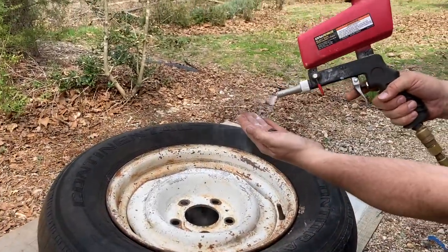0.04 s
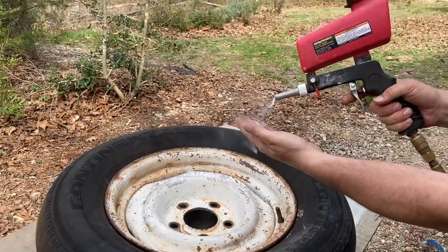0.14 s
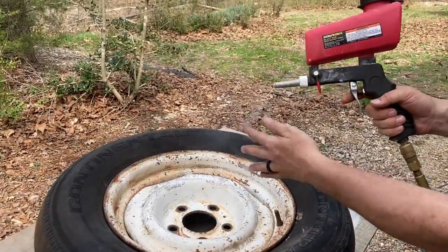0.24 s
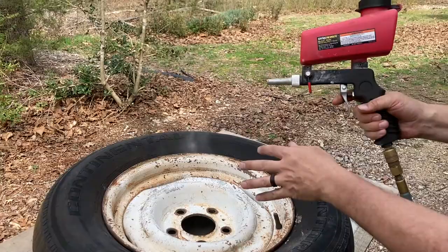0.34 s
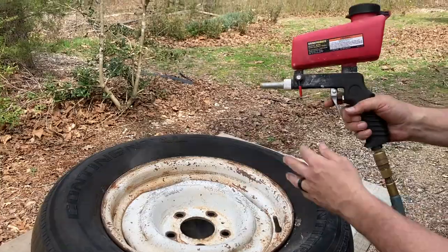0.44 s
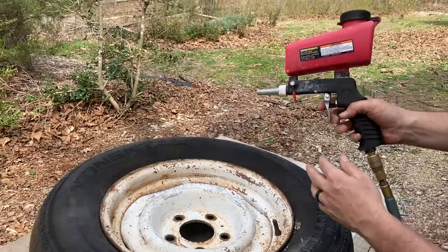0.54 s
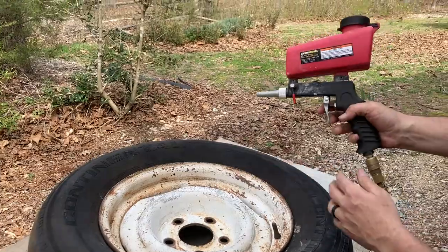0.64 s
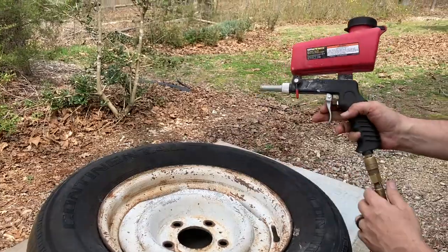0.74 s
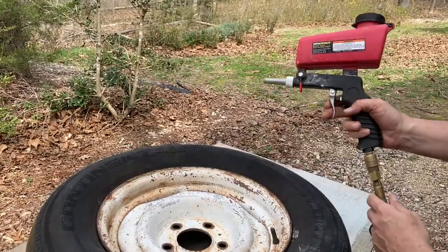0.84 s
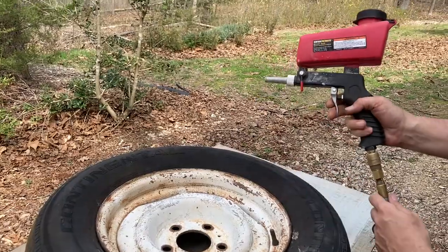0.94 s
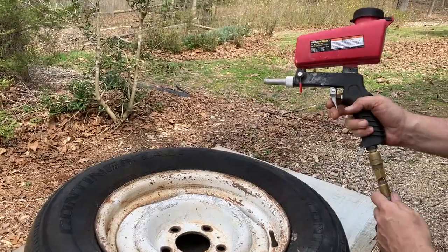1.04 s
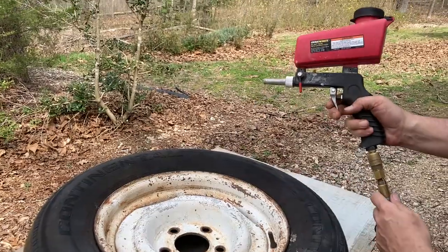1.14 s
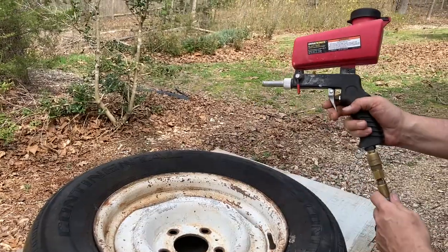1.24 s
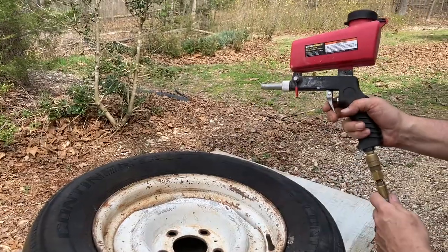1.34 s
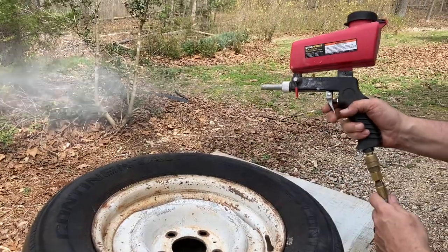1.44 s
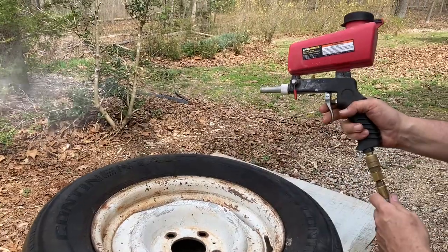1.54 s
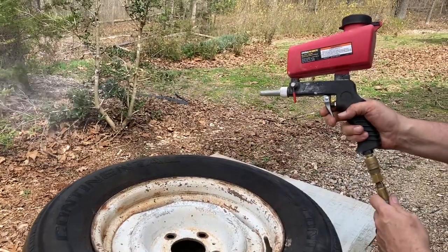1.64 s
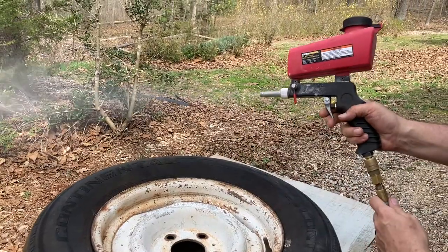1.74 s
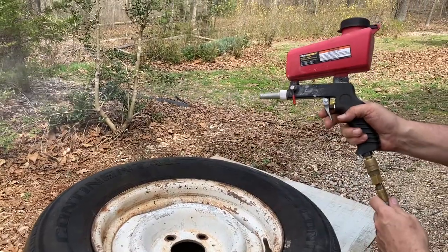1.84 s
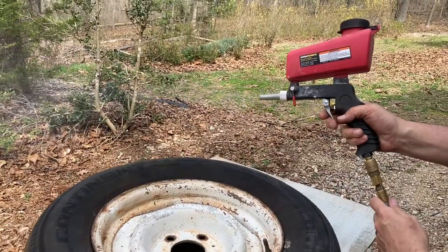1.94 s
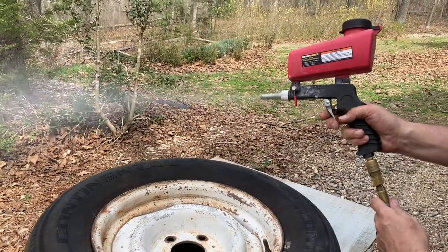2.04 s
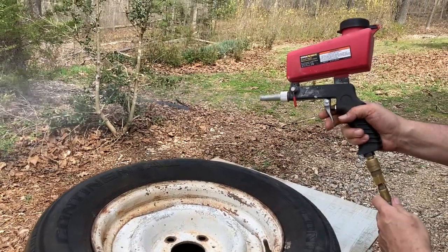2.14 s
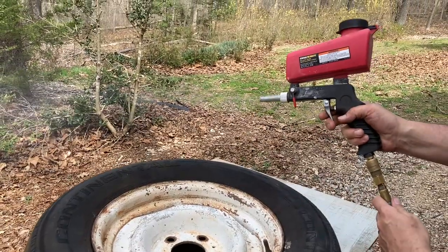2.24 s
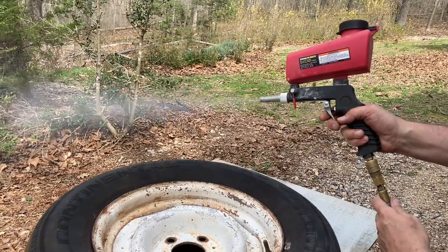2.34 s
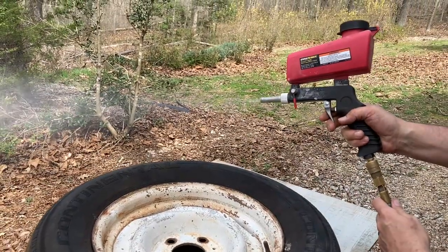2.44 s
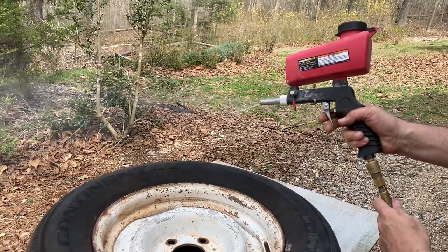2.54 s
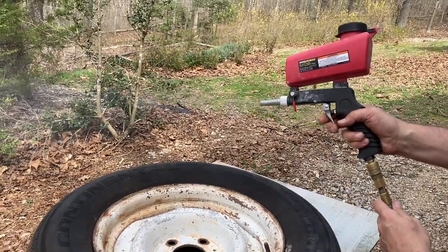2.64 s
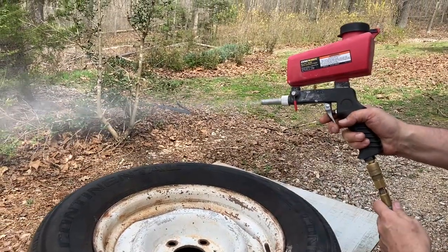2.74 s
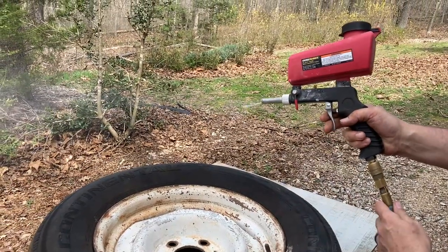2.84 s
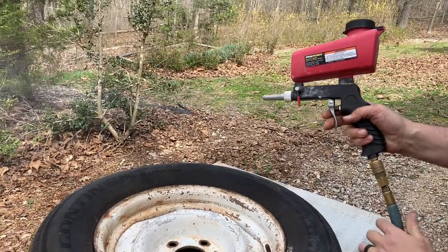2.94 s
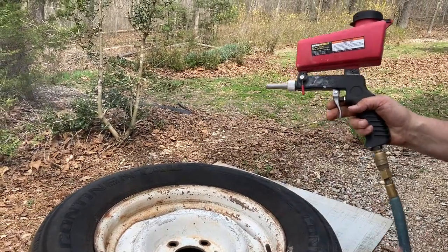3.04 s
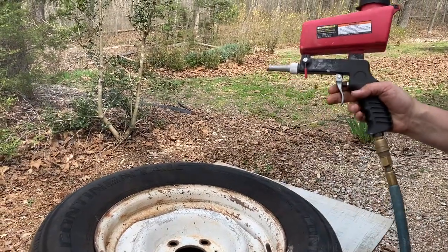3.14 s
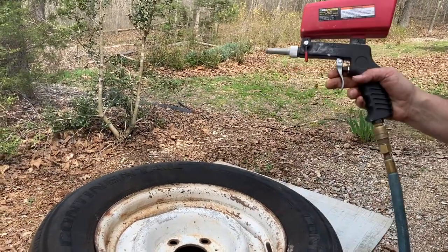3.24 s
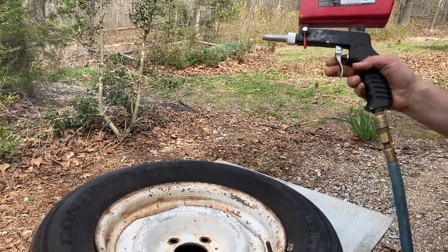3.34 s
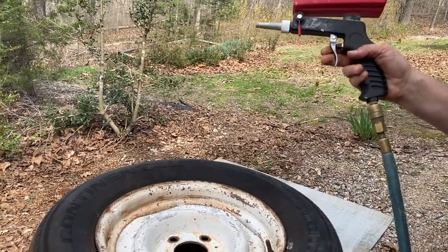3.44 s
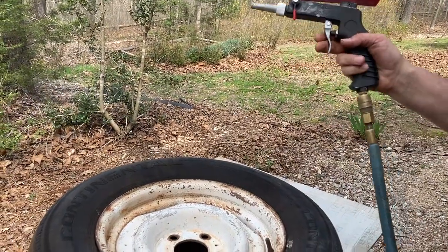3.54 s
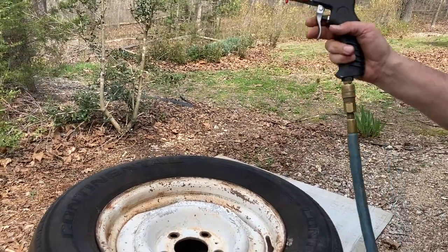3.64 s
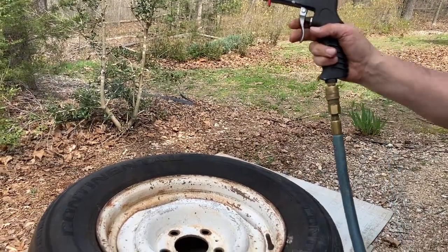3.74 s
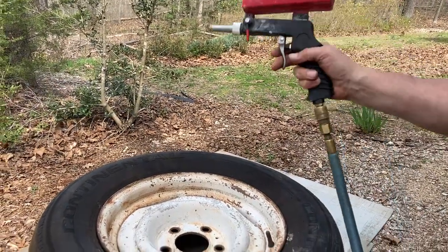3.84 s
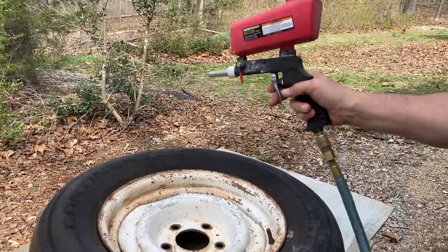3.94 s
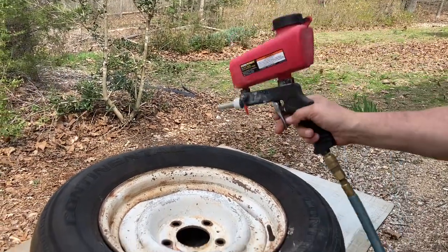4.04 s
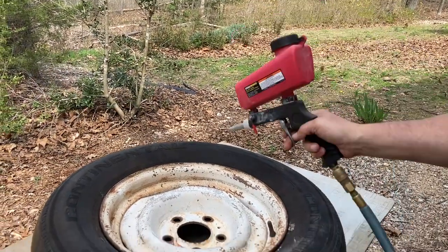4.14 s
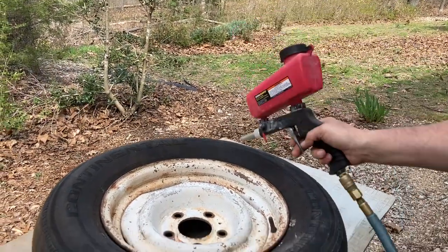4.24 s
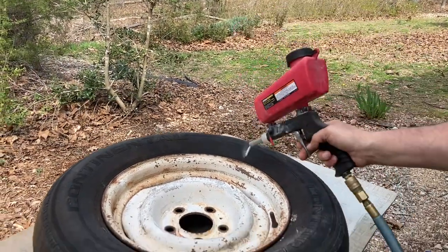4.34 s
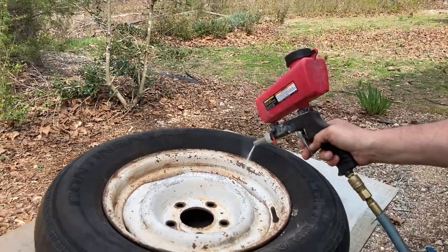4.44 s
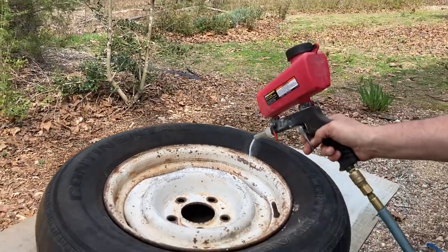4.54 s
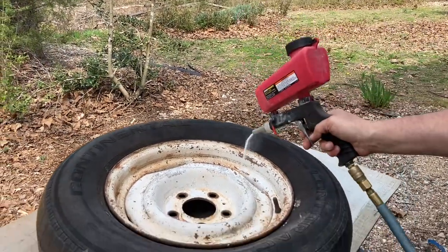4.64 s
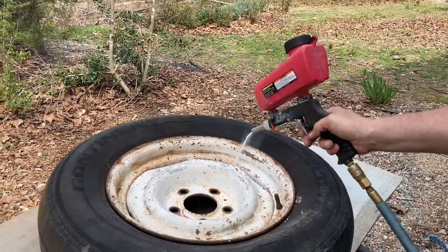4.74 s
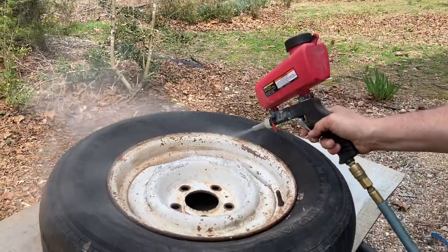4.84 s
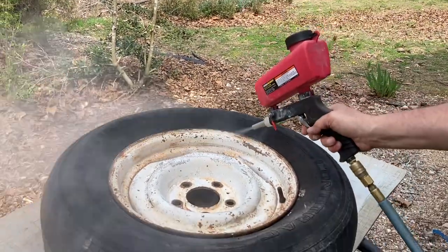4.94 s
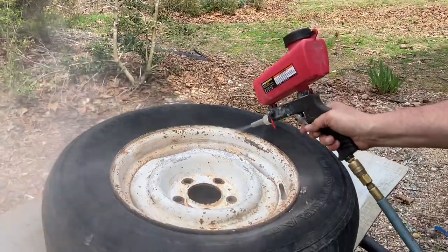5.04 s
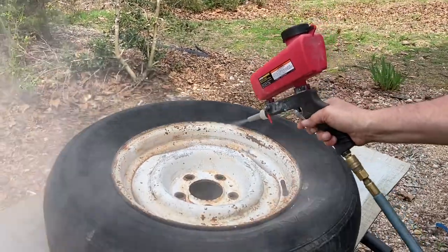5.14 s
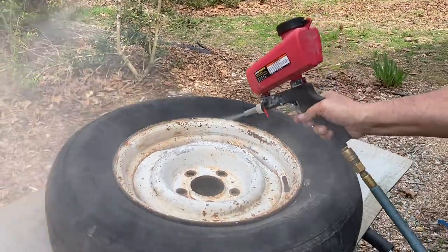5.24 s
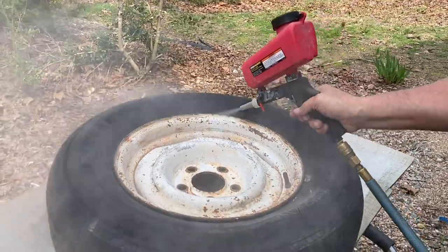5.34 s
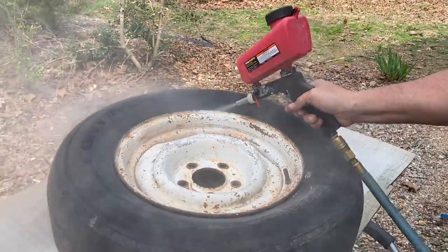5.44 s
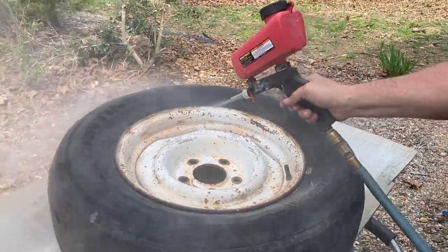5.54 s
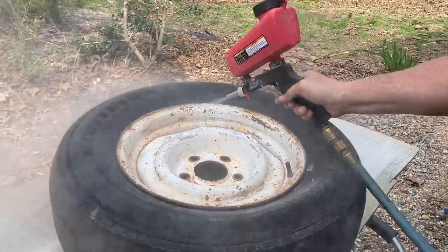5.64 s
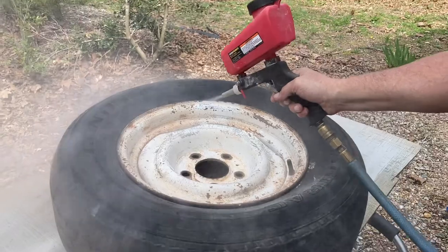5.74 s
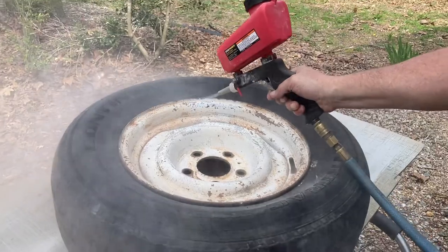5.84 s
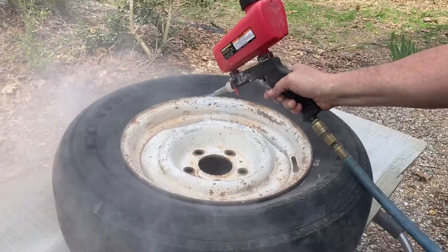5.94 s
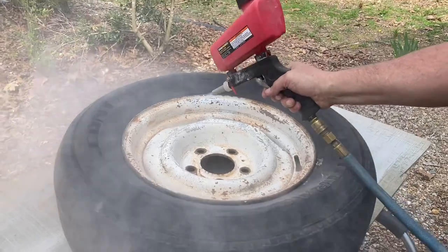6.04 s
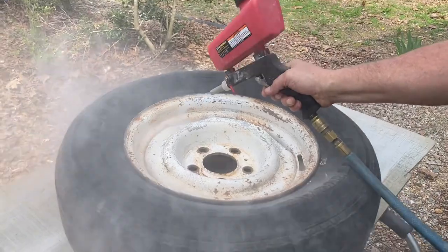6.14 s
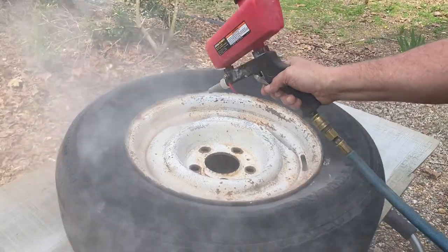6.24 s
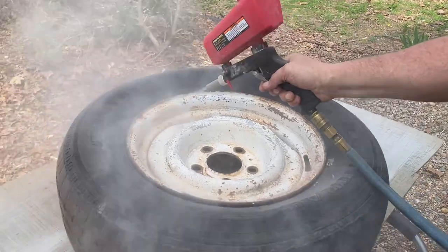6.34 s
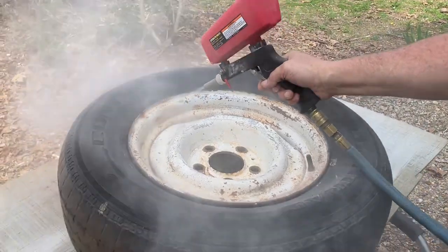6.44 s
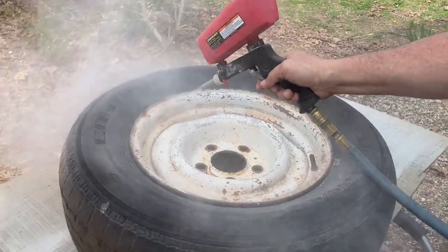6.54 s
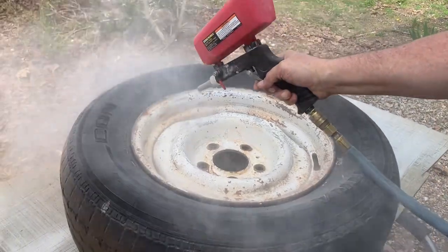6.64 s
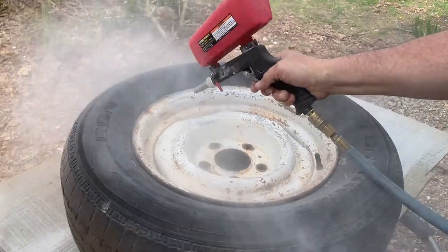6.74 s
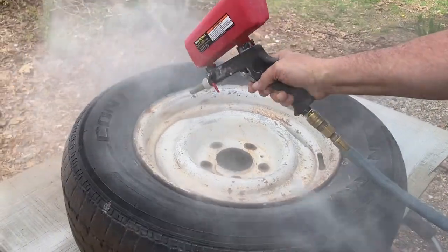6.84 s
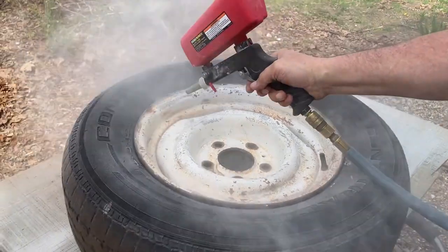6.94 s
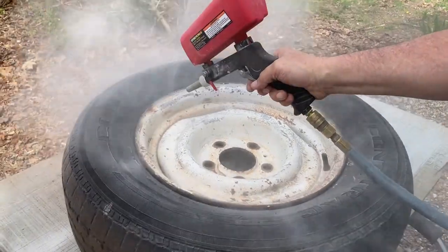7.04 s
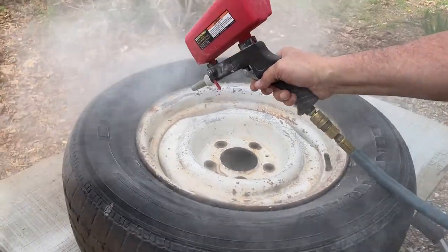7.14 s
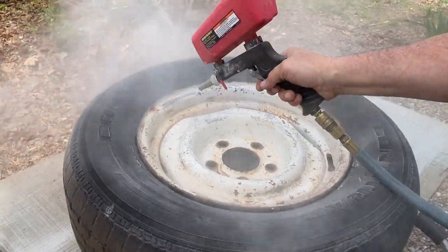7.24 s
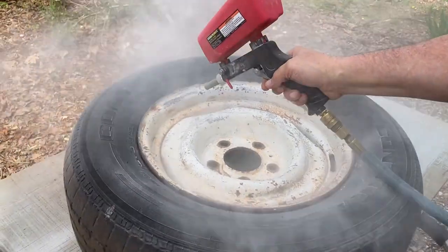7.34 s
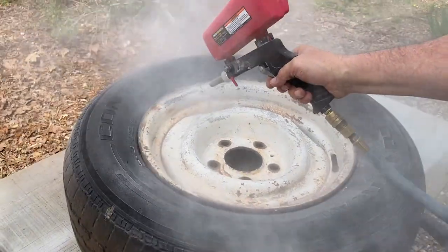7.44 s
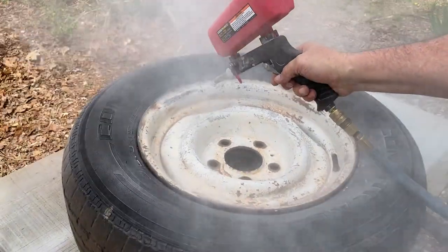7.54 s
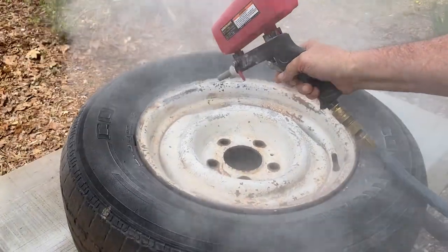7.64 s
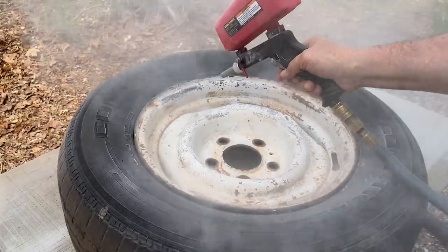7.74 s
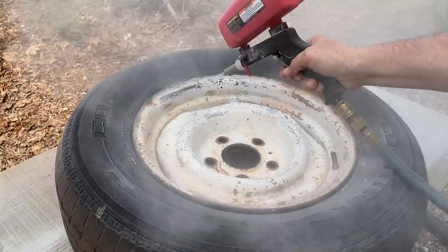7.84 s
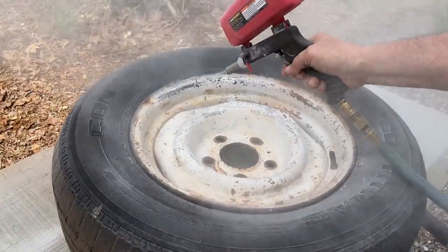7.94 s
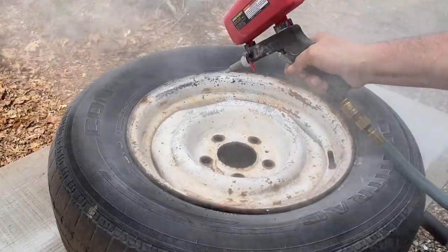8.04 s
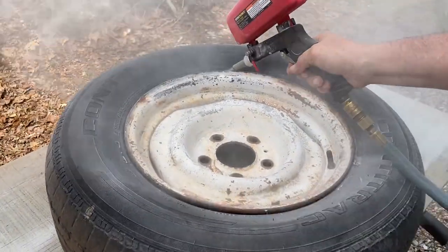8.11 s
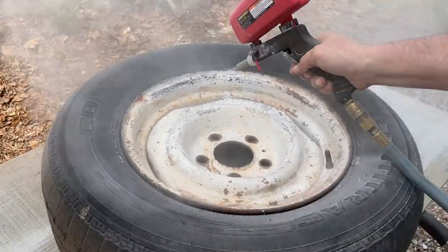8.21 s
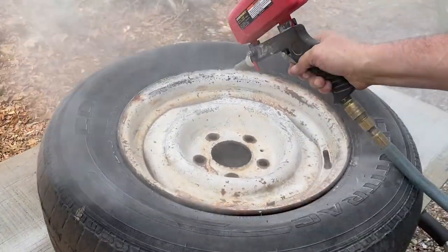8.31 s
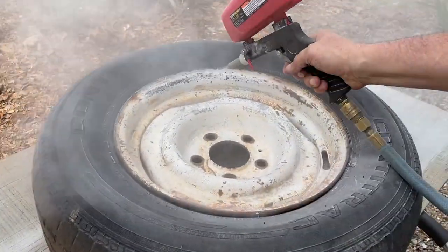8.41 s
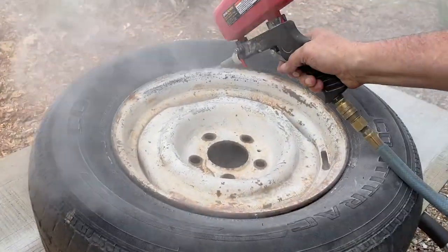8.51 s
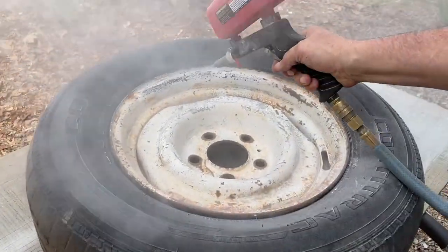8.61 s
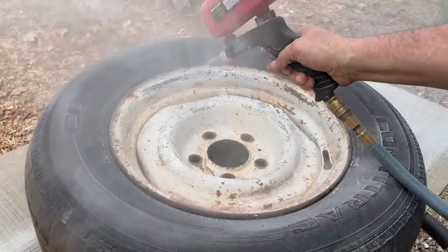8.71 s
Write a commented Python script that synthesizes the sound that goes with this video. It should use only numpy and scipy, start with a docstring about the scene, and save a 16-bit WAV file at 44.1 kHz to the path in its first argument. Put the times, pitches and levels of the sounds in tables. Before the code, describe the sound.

Five short, sharp air-gun puffs outdoors with leafy rustles around them, then one long, loud, harsh blast of powder against a steel wheel.

```python
"""Powder blaster in a yard

Five short puffs into open air, with shuffling on dry leaves and gravel before and after; then one long blast
against a steel wheel. The jets are coloured noise under valve curves; wheel and tyre resonances colour the
blast. Knocks and jolts are damped swings, footing is grains of noise, and a far rumble lies under it all. Two
microphone ports hear the sources with their own lead, likeness and balance; the spray is unrelated at each."""
import sys
import numpy as np
from scipy import signal
from scipy.fft import rfft, irfft, next_fast_len
from scipy.io import wavfile
from scipy.ndimage import uniform_filter1d

SR = 44100
rng = np.random.default_rng(int(sys.argv[2]) if len(sys.argv) > 2 else 0)


def store_wav(level_fs):
    """Save 16-bit WAV to argv[1]."""
    pcm = np.round(np.clip(np.atleast_2d(level_fs), -1, 1) * 32767)
    wavfile.write(sys.argv[1], SR, pcm.T.astype(np.int16))


N = 386757
T = np.arange(N) / SR  # seconds
SILENT_DB = -200

# Either valve starts to leak LEAK_S before it is fully open; the leak lies LEAK_DB from a reference level.
LEAK_S, LEAK_DB = 0.008, -18.5

# Trigger pull at the wheel: cracks_s, open_s, settled_s (first surge ends), surge_db (at open_s)
BLAST_VALVE = (4.768, 4.780, 4.797, 5.0)
# Nozzle hiss as the gun sweeps: time_s, level_db (before the valve and high-passes)
NOZZLE_LEVEL = [(4.82, -18.5), (4.95, -24.5), (5.3, -22), (5.65, -24), (5.95, -21), (6.17, -27.5),
                (6.42, -23.5), (6.66, -27.5), (7.01, -25), (7.37, -26.5), (7.8, -21), (8.05, -20.5),
                (8.4, -23.5), (8.55, -22.5), (8.77, -24)]
# The jet moving round the wheel, before the valve and high-passes:
# time_s, steel_db (powder on steel), rim_db, upper_rim_db, tyre_db
WHEEL_LEVEL = [(4.85, -25.5, -34.5, -23, -34), (5.03, -29.5, -31, -31, -28.5), (5.15, -27, -27, -25, -28),
               (5.3, -25, -32.5, -23.5, -40), (5.7, -29, -31, -29, -34), (6.12, -29.5, -31.5, -37.5, -35),
               (6.45, -29.5, -37, -34.5, -38), (7.0, -26.5, -43.5, -40, -49.5), (7.4, -28, -38, -37.5, -39),
               (7.75, -25, -34.5, -37.5, -35), (8.3, -30.5, -37, -32.5, -41.5),
               (8.77, -28.5, -38.5, -45.5, -40)]
# Resonances of each part: pitch_hz, width_hz (between half-amplitude points), level_db (relative)
NOZZLE_MODES = [(7890, 2860, 2.5), (10150, 760, 3.5), (12180, 4800, 0), (16100, 2500, -4)]
STEEL_MODES = [(2300, 950, -2), (3760, 1220, -1.1), (4800, 800, -1)]
RIM_MODES = [(770, 257, -11), (980, 860, 8.5)]
UPPER_RIM_MODES = [(1500, 660, 0)]
TYRE_MODES = [(200.8, 22.7, 7), (295, 43, -6), (388, 65, -9.5)]
BLAST_SPUTTER_DB = 0.45  # rms swing


def blast():
    """Long jet at the wheel: hiss from nozzle and steel; rim and tyre ring and sputter with the powder feed."""
    cracks, opened, settled, surge_db = BLAST_VALVE
    valve_times = [cracks, opened - LEAK_S, opened, settled, settled + 0.022]
    valve_db = np.interp(T, valve_times, [-35, LEAK_DB, surge_db, surge_db / 2, 0], SILENT_DB)

    nozzle_db = np.interp(T, *np.transpose(NOZZLE_LEVEL))
    s, *columns = np.transpose(WHEEL_LEVEL)
    steel_db, rim_db, upper_rim_db, tyre_db = (np.interp(T, s, column) for column in columns)
    nozzle = gain_of(nozzle_db) * hiss(ringing(NOZZLE_MODES), 2.14)
    wheel = gain_of(steel_db) * hiss(ringing(STEEL_MODES), 2.13)
    fine_powder = signal.butter(2, 800, "highpass", fs=SR, output="sos")  # fine powder makes no low sound
    nozzle, wheel = signal.sosfilt(fine_powder, [nozzle, wheel])

    sputter = gain_of(BLAST_SPUTTER_DB * uneven_feed())
    for modes, level_db in [(RIM_MODES, rim_db), (UPPER_RIM_MODES, upper_rim_db), (TYRE_MODES, tyre_db)]:
        wheel += sputter * gain_of(level_db) * hiss(ringing(modes), 1.2)
    no_bass = signal.butter(3, 140, "highpass", fs=SR, output="sos")  # a small jet radiates no deep bass
    return signal.sosfilt(no_bass, gain_of(valve_db) * (nozzle + wheel))


# Trigger pulls into open air: open_s (fully open), held_s, surge_db (hiss level at open_s)
PUFFS = [(1.374, 0.074, -13.5), (1.673, 0.058, -14), (1.96, 0.096, -14), (2.306, 0.13, -16.5),
         (2.663, 0.09, -17.5)]
# Colours of the thin hiss, the lumpy roar, and the kick as the hose unloads: pitch_hz, density_db (relative, per Hz)
FREE_JET = [(2500, -11), (4200, -6), (6300, -1), (8500, 0.5), (11500, 3.5), (16000, -2)]
FREE_ROAR = [(200, -15.5), (400, -9), (1000, 0.5), (2200, 0), (2800, -10.5), (3200, 4), (3650, -5.5),
             (4100, 9), (6000, -46)]
KICK = [(30, -3.5), (65, -6), (170, -15.5), (350, -5), (800, -48.5)]
STEADY_DB, ROAR_DB = -20.5, -10  # every surge drifts to one steady hiss by closing; roar gain beside the hiss
PUFF_SPUTTER_DB = 2.5  # rms swing of the roar
CRACK_S, CRACK_DB = 0.013, -16  # the valve cracks this long before it is open; first seep relative to the surge
ROAR_LEAK_DB = -12.5  # roar curve at the leak, relative to the surge
SHUT_S, BLEED_S = 0.0068, 0.068  # the valve shuts; trapped air bleeds out
THROB_S, THROB_LEAD_S, THROB_RISE_S, THROB_DB = 0.029, 0.0115, 0.0025, 3  # period, start before open, rise, lift
KICK_DB, KICK_PER_SURGE, KICK_S = -41.5, 2.95, 0.041  # kick at a steady surge, dB per dB of surge, fading time


def puffs():
    """Open-air jets under the valve: a pressure wave up and down the hose lifts the roar at each return."""
    thin = hiss(sloped(FREE_JET), 1.5)
    roar = hiss(sloped(FREE_ROAR), 2.5, gain_of(PUFF_SPUTTER_DB * uneven_feed()))
    low = hiss(sloped(KICK), 0)
    jets, kicks = np.zeros((2, 2, N))
    flow = np.zeros(N)
    for opened, held, surge_db in PUFFS:
        closing = opened + held
        shut = closing + SHUT_S
        times = [opened - CRACK_S, opened - LEAK_S, opened, closing, shut, shut + BLEED_S]
        seep_db = surge_db + CRACK_DB
        later_db = [surge_db, STEADY_DB, STEADY_DB - 13.5, STEADY_DB - 50]
        flow_db = np.interp(T, times, [seep_db, surge_db + LEAK_DB] + later_db, SILENT_DB, SILENT_DB)
        roar_db = np.interp(T, times, [seep_db, surge_db + ROAR_LEAK_DB] + later_db, SILENT_DB, SILENT_DB)

        since_return = (T - opened + THROB_LEAD_S) % THROB_S / THROB_RISE_S
        roar_db += THROB_DB * since_return * np.exp(1 - since_return) * (T < closing)
        jets += gain_of(flow_db) * thin + gain_of(roar_db + ROAR_DB) * roar
        flow += gain_of(flow_db)

        kick_db = KICK_DB + KICK_PER_SURGE * (surge_db - STEADY_DB)
        kick_times = [opened - LEAK_S, opened + 0.0019, opened + KICK_S]
        kick_shape_db = np.interp(T, kick_times, [-25, 0, -27], SILENT_DB, SILENT_DB)
        kicks += gain_of(kick_db + kick_shape_db) * low
    return jets + kicks, flow


def uneven_feed():
    """Powder arrives in lumps: noise between 20 and 55 Hz, scaled to rms 1."""
    band = signal.butter(2, [20, 55], "bandpass", fs=SR, output="sos")
    return evened(signal.sosfilt(band, rng.standard_normal(N)))


# Knocks at the nozzle, from powder clumps and from the pressure wave returning up the hose: start_s, level_db
# (envelope peak), pitch_hz
KNOCKS = [(1.372, -2, 4000), (1.373, -5.5, 1200), (1.665, -18, 1000), (1.690, -8, 2100), (1.958, -17, 900),
          (1.980, -33, 2270), (1.980, -11, 4100), (2.038, -18, 4200), (2.293, -26, 995),
          (2.311, -23.5, 1170), (2.326, -9, 2140), (2.354, -21.5, 895), (2.381, -17.5, 2100),
          (2.682, -14.5, 2280), (4.782, -24, 1590), (4.784, -5, 4300)]
# Jolts of the air column in the hose as the valve opens: start_s, level_db (envelope peak), pitch_hz
JOLTS = [(1.375, -13.5, 163), (1.379, -18, 114), (1.666, -18.5, 219), (1.955, -19, 300), (2.324, -32, 191),
         (2.651, -30, 299), (4.783, -25, 108)]
# The air column jolts as a puff's valve shuts: delay_s (after closing starts), level_db (envelope peak), pitch_hz
SHUT_JOLT = (0.005, -26, 220)


def spits():
    """Knocks at the nozzle and jolts of the air column, each one damped swing."""
    out = np.zeros((2, N))
    for start, level_db, pitch_hz in KNOCKS:
        add(out, start, ping(level_db, pitch_hz, cycles=1.2))
    delay, shut_db, shut_hz = SHUT_JOLT
    shut_jolts = [(opened + held + delay, shut_db, shut_hz) for opened, held, _ in PUFFS]
    for start, level_db, pitch_hz in JOLTS + shut_jolts:
        add(out, start, ping(level_db, pitch_hz, cycles=0.34))
    return out


# Powder thrown back off the wheel: time_s, level_db
SPRAY_LEVEL = [(4.79, -28.5), (5.35, -42), (6.15, -66), (6.55, -44.5), (7.7, -64), (8.15, -29.5),
               (8.5, -45)]
# Band of the spray: low_hz, high_hz
SPRAY_BAND = [4240, 6300]


def spray():
    """Rebounding powder all round the microphone: band noise, unrelated at the two ports."""
    level_db = np.interp(T, *np.transpose(SPRAY_LEVEL), SILENT_DB)
    band = signal.butter(2, SPRAY_BAND, "bandpass", fs=SR, output="sos")
    return gain_of(level_db) * evened(signal.sosfilt(band, rng.standard_normal((2, N))))


# Feet and hose on leaves and gravel: start_s, held_s, crackle_db, low_scuff_db, high_scuff_db
SHUFFLES = [(.28, 0.16, -66.5, -88, -68), (.525, 0.012, -71, -92, -69), (.94, 0.028, -71, -90, -70),
            (3.03, 0.11, -63, -84, -72), (3.14, 0.036, -57.5, -68, -66), (3.24, 0.1, -60, -54.5, -60.5),
            (3.55, 0.13, -53.5, -69, -70), (3.791, 0.089, -62.5, -66, -68), (3.92, 0.11, -58, -63, -62),
            (4.06, 0.075, -49, -62, -53), (4.195, 0.025, -44.5, -56, -53.5),
            (4.34, 0.024, -51.5, -55.5, -66)]
# Colour of the crackle: pitch_hz, density_db (relative, per Hz)
CRACKLE = [(2000, -27), (3400, 1), (5200, 4.5), (6600, -2), (9000, 6.5), (16000, 2)]
# Low scuff, then high scuff: pitch_hz, width_hz (between half-amplitude points), level_db (relative)
SCUFF_MODES = [
    [(1054, 1100, 0)],
    [(2110, 690, -8.5), (3380, 500, -13.5)],
]
# Single snaps underfoot: start_s, level_db (envelope peak), pitch_hz, ring_cycles,
# bright_db (wide tick against the ring, before TICK_DB)
SNAPS = [(0.110, -34, 1390, 0.32, -29), (0.535, -49.5, 2080, 2.1, 6), (3.211, -38, 1190, 1, -22),
         (3.270, -33, 1220, 0.85, -12), (3.808, -54, 2350, 1.9, 15), (3.837, -32.5, 1300, 0.25, -28),
         (4.197, -40, 1940, .6, 9), (4.251, -49, 3400, 2.5, -8), (4.264, -40, 2040, 1, 8),
         (4.274, -39, 1390, 0.84, -5), (4.334, -39, 1800, .6, -5)]
RISE_DB_PER_S, FALL_DB_PER_S = 294, 125.5
TICK_DB, TICK_T60_S = -6.5, 0.029  # offset of every tick; time to die by 60 dB


def shuffles():
    """Leaves and gravel underfoot: dense uneven grains of noise, duller scuffs, and single ringing snaps."""
    strengths = gain_of(1.8 * np.minimum(rng.exponential(1, N), 3))
    grains = strengths * (rng.random(N) < 150 / SR)  # about 150 a second
    drive = 1 + signal.lfilter([1], [1, -.98], grains)  # each grain is a burst of about a millisecond

    levels_db = np.full((3, N), float(SILENT_DB))
    for start, held, *peaks_db in SHUFFLES:
        rise_db = -RISE_DB_PER_S * np.maximum(start - T, 0)
        fall_db = -FALL_DB_PER_S * np.maximum(T - start - held, 0)
        levels_db = np.maximum(levels_db, np.add.outer(peaks_db, rise_db + fall_db))
    crackle_level, *scuff_levels = gain_of(levels_db)
    out = crackle_level * hiss(sloped(CRACKLE), 1.2, drive)
    for modes, level in zip(SCUFF_MODES, scuff_levels):
        out += level * hiss(ringing(modes), 1.5, drive)

    for start, level_db, pitch_hz, cycles, bright_db in SNAPS:
        tick_db = level_db + bright_db + TICK_DB - 60 * T[:500] / TICK_T60_S
        add(out, start, gain_of(tick_db) * rng.standard_normal((2, 500)))
        add(out, start, ping(level_db, pitch_hz, cycles))
    return out


# How long the yard rings: pitch_hz, t60_s (time to die by 60 dB)
YARD_T60 = [(200, 0.94), (8000, 0.61), (16000, 0.92)]


def yard(pair):
    """Trees and fence scatter the sound back: a noise tail, each band dying at its own speed."""
    hz, t, z = signal.stft(rng.standard_normal((2, SR)), SR, nperseg=256)
    t60 = np.interp(hz, *np.transpose(YARD_T60))[:, None]
    tail = signal.istft(z * gain_of(-60 * t / t60), SR, nperseg=256)[1]
    return signal.fftconvolve(pair, tail / np.linalg.norm(tail[0]), axes=1)[:, :N]


# Far traffic and air: pitch_hz, density_db (relative, per Hz)
RUMBLE = [(25, -27.5), (55, 6.5), (110, 2), (200, -10), (340, -8), (550, -16.5), (1500, -24), (2200, -30.5),
          (5800, -43)]
RUMBLE_DB, SUNK_DB, SINK_S = -53, -63.5, 0.13  # before the microphone's bass cut; it sinks as the blast opens


def rumble():
    """Far traffic and air: low noise that sinks under the long blast."""
    opened = BLAST_VALVE[1]
    level_db = np.interp(T, [opened, opened + SINK_S], [RUMBLE_DB, SUNK_DB])
    return gain_of(level_db) * hiss(sloped(RUMBLE), 1.6)


def gain_of(db):
    """Decibels to a factor."""
    return 10 ** (np.asarray(db) / 20)


def evened(x):
    """Scales to rms 1."""
    return x / np.sqrt(np.mean(x ** 2) + 1e-20)


def sloped(points):
    """Gain over frequency, drawn through (Hz, dB) points on a log frequency axis."""
    f, db = np.transpose(points)
    return lambda hz: gain_of(np.interp(np.log(hz + 1), np.log(f + 1), db))


def ringing(modes):
    """Gain over frequency from resonances, each applied twice for dark valleys, summed in power."""
    def colour(hz):
        """Joint gain of all resonances."""
        curves = [gain_of(db) / (1 + (2 * (hz - f) / width) ** 2) for f, width, db in modes]
        return np.sqrt(sum(curve ** 2 for curve in curves))
    return colour


def hiss(colour, patchy_db, drive=1.):
    """Two unrelated noises at rms 1 that share one colour, one drive and slowly drifting patches."""
    hz, t, z = signal.stft(drive * rng.standard_normal((2, N)), SR, nperseg=1024, noverlap=768)
    patches = uniform_filter1d(rng.standard_normal(z.shape[1:]), size=12, axis=0)  # about 500 Hz wide
    patches = evened(uniform_filter1d(patches, size=20, axis=1))  # about 0.1 s long
    z = z * colour(hz)[:, None] * gain_of(patchy_db * patches)
    return evened(signal.istft(z, SR, nperseg=1024, noverlap=768)[1][:, :N])


def ping(db, hz, cycles):
    """A damped swing whose envelope peaks after the given cycles, and the same swing a quarter turn later."""
    u = np.arange(int(4 * cycles * SR / hz)) * hz / SR  # time in cycles
    envelope = np.e * u / cycles * np.exp(-u / cycles)
    quarter_turn = np.array([[0], [1 / 4]])
    return gain_of(db) * envelope * np.sin(2 * np.pi * (u + quarter_turn))


def add(mix, s, sound):
    """Mixes a short sound in at time s."""
    part = mix[:, round(s * SR):][:, :sound.shape[-1]]
    part += sound[..., :part.shape[1]]


CROSSOVER_HZ = (6400, 6900)  # the tables for the ports give way to the treble rule here
IN_STEP_HZ, TURN_HZ = 6970, 4380  # treble: in step here; the right port gains one cycle of lead per TURN_HZ
TREBLE_LIKENESS = .985


def ports(pair, table):
    """Left port hears the first sound; right hears it phase-shifted, blended with the second, unrelated one."""
    size = next_fast_len(N + 4096)
    hz, (first, second) = np.fft.rfftfreq(size, 1 / SR), rfft(pair, size)
    f, *columns = np.transpose(table)
    lead, same, tilt_db = (np.interp(hz, f, column) for column in columns)
    treble = np.interp(hz, CROSSOVER_HZ, [0, 1])
    lead = (1 - treble) * lead + treble * 2 * np.pi * (IN_STEP_HZ - hz) / TURN_HZ
    same = (1 - treble) * same + treble * TREBLE_LIKENESS
    curves = [lead, same, tilt_db * (1 - treble)]

    bins = 120 * size // SR  # corners rounded over 120 Hz, twice: the paths to the ports are short
    curves = uniform_filter1d(curves, bins, axis=1)
    lead, same, tilt_db = uniform_filter1d(curves, bins, axis=1)
    blend = same * first * np.exp(-1j * lead) + np.sqrt(1 - same ** 2) * second
    return irfft([first, blend / gain_of(tilt_db)], size)[:, :N]


# The port pair below the crossover, for the open-air jet, the wheel, and the surroundings:
# pitch_hz, lead_rad (left leads), likeness (0-1), balance_db (left minus right, for the shared level)
IN_AIR = [(100, 0, .99, -3.5), (500, .3, .97, 0), (900, .1, .9, 3), (1550, 2.2, .7, 2), (2000, -.2, .85, 1),
          (2720, 3.0, .93, -1), (3150, 1.5, .5, -1), (3620, 3.1, .93, -1), (4600, 1.5, .3, -2),
          (6000, 2.1, .5, -1)]
AT_WHEEL = [(100, 0, .99, -3), (430, .3, .98, -1), (510, 1.9, .9, 2), (720, .4, .9, 4), (1050, .2, .96, 1),
            (1550, 1.7, .85, 4.5), (1800, 1.5, .4, 5), (2050, 0, .75, 1), (2350, 1.5, .6, 3),
            (2650, .3, .7, 1), (3050, 2.7, .8, 0), (3600, 2.7, .8, 0), (4100, 2.6, .3, 1),
            (5350, 3.1, .96, 0), (5950, 3.1, .96, 0), (6350, 1.8, .15, 0)]
AROUND = [(100, 0, .99, -3.7), (400, 0, .95, -1), (800, .8, .4, 1.5), (2200, -1, .6, 2),
          (5800, -3.0, .4, 0)]
# The puffs as the yard returns them: pitch_hz, density_db (relative, per Hz)
SCATTERED = [(300, -22.5), (1500, -1.5), (4000, 0.5), (9000, 0), (16000, -18)]
YARD_DB = -28.5  # gain of the echo


def scene():
    """Each source reaches the port pair from its own place; the yard echoes the puffs."""
    jets, flow = puffs()
    near = ports(jets + spits(), IN_AIR) + ports(blast(), AT_WHEEL) + spray()
    echo = gain_of(YARD_DB) * yard(flow * hiss(sloped(SCATTERED), 0))
    return near + ports(echo + shuffles() + rumble(), AROUND)


def record(dry):
    """The microphone sheds the deepest bass below 42 Hz; then a steep band limit at 15.8 kHz."""
    bass_cut = signal.butter(3, 42, "highpass", fs=SR, output="sos")
    band_limit = signal.firwin(1023, 15800, window=("kaiser", 8), fs=SR)
    return signal.oaconvolve(signal.sosfilt(bass_cut, dry), band_limit[None], "same")


dry = scene()
out = record(dry)
store_wav(out)
```